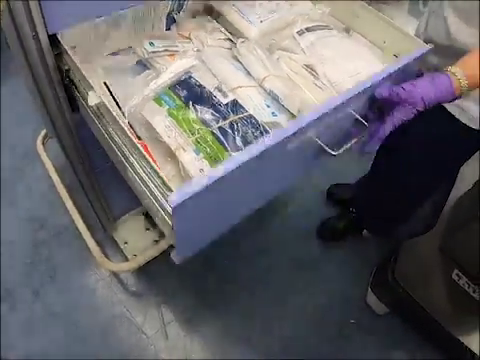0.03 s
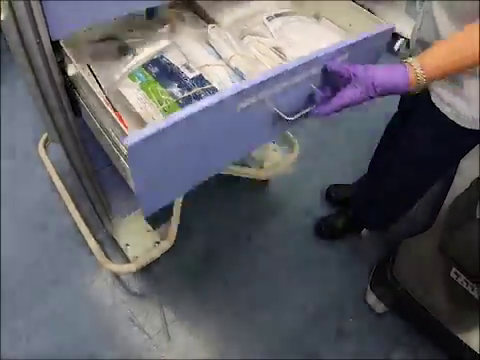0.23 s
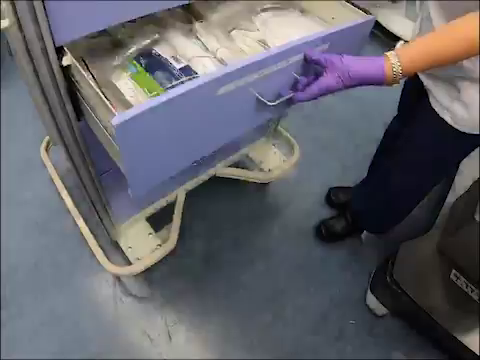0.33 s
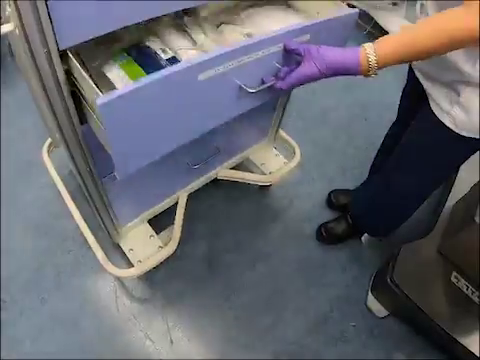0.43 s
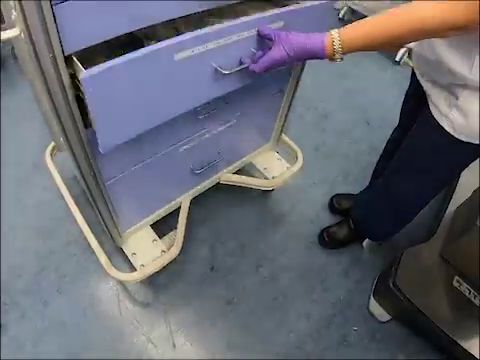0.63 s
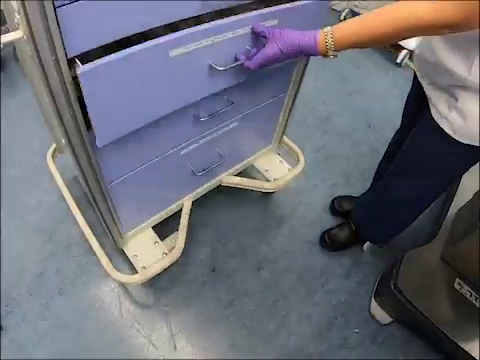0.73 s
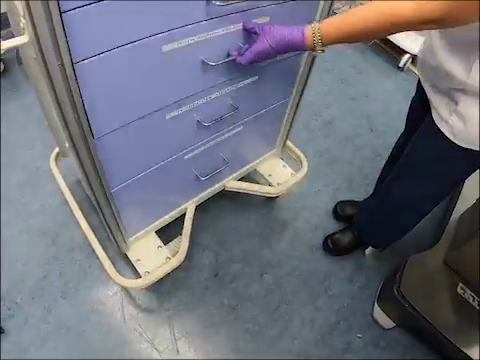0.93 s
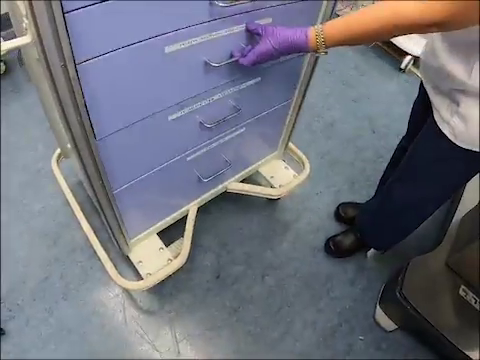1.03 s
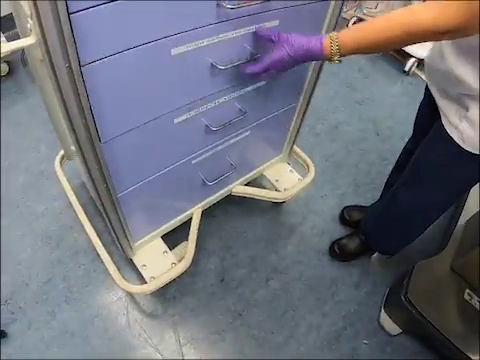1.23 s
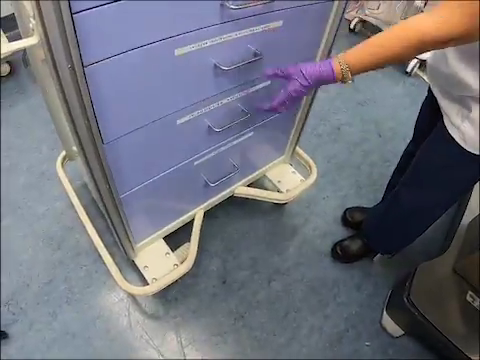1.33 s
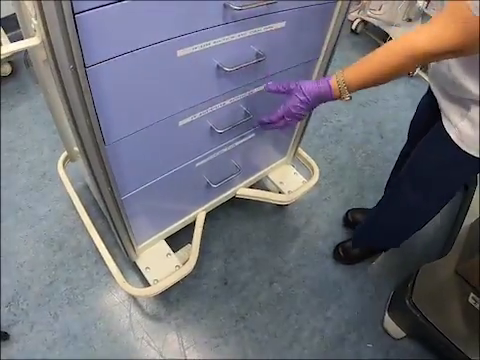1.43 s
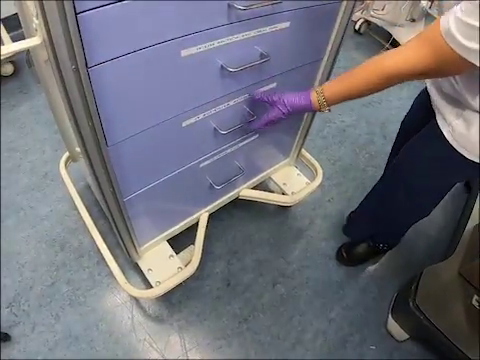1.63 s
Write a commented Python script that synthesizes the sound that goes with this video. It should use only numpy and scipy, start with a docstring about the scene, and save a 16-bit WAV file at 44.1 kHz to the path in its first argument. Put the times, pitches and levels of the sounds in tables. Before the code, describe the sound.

A metal cart drawer is pushed shut with a rattle, sharp clacks and a ringing bang.

```python
"""A loaded supply drawer jolts and rattles as it is pushed into a steel cart in a small, quiet room.
It clacks over its rail joint, squeaks faintly, then bangs into the cart and latches. Each blow is a
crack, chatter and ringing steel. The cart booms and rocks on its castors, the load shifts, and the
handle ticks as the hand lets go. Ventilation hums throughout."""
import sys
import numpy as np
from scipy import signal
from scipy.fft import rfft, irfft
from scipy.io import wavfile

SR = 44100
rng = np.random.default_rng(int(sys.argv[2]) if len(sys.argv) > 2 else 0)


def store_wav(level_fs):
    """Save 16-bit WAV to argv[1]."""
    pcm = np.round(np.clip(np.atleast_2d(level_fs), -1, 1) * 32767)
    wavfile.write(sys.argv[1], SR, pcm.T.astype(np.int16))


N = 74970
TIME_S = np.arange(N) / SR
FREQS_HZ = np.maximum(np.fft.rfftfreq(N, 1 / SR), 1)
BANDS_HZ = np.geomspace(60, 15000, num=20)

# Blows. Each row: start in seconds, part, ring level in dB, crack in dB re ring, treble shift in dB,
# chatter energy in dB re ring, chatter length in seconds.
BLOWS = [ (0.2357, "drawer", 2, 5, 1.5, -1.5, 0.082), (0.4448, "rail", -8.5, 13.5, 4, -20, .002),
         (0.4470, "rail", -9, 11.5, 9.5, -18, .002), (0.449, "rail", -12, -8, 12.5, -21, .002),
         (0.4554, "rail", -1, 12.5, -48, -16, 0.099), (0.7325, "cart", -12.5, 0.5, 6, 11.5, 0.024),
         (0.7432, "cart", 1, 9, -12.5, -22, 0.016), (0.7770, "latch", 2, 6, 0.5, -4.5, 0.073),
         (1.275, "handle", -3, 12, -0.5, -6, .004), ]
# Close-packed resonances, by part. Each row: frequency in Hz, level in dB per Hz.
PART_SPECTRA = { "drawer": [(70, -69), (160, -65.5), (280, -81), (430, -60.5), (700, -57), (1200, -62),
                (2200, -61.5), (3100, -68.5), (4000, -77.5), (9800, -87), (12000, -103)],
                "rail": [(70, -71.5), (220, -74), (390, -58.5), (560, -69.5), (830, -63.5), (1200, -78),
                (1800, -68.5), (3300, -76), (5500, -89.5), (9800, -95.5), (12000, -109)],
                "cart": [(70, -82), (150, -69), (260, -53.5), (400, -62), (550, -55.5), (700, -68),
                (850, -63), (1100, -66.5), (1900, -70.5), (2900, -67), (4000, -79.5), (9800, -93),
                (12000, -103)], "latch": [(150, -67), (450, -69.5), (1500, -70.5), (3000, -75.5),
                (4300, -79), (6700, -82), (10000, -87), (12000, -103)], "handle": [(2500, -130),
                (4500, -107), (7000, -110), (10000, -114), (13000, -132)], }
# Clear modes, by part. Each row: frequency in Hz, level in dB for a 0 dB blow, T60 in seconds.
PART_MODES = { "drawer": [(417, -44, .45), (565, -35, .58), (712, -33.5, .52), (755, -39, .42),
              (1023, -43, .42), (1085, -43, .42), (1227, -43, .22), (1672, -44, .4), (1803, -36.5, .45),
              (1992, -42.5, .45), (2262, -42.5, .45), (2482, -43.5, .45)], "rail": [(371, -42, .42),
              (818, -41.5, .38), (1610, -47, .3), (2250, -50, .4)], "cart": [(226, -36, .3),
              (316, -40, .38), (523, -34, .33), (615, -37.5, .28), (830, -39, .32), (1642, -43, .3),
              (2643, -44, .28), (2735, -47, .28)], "latch": [(2970, -55, 0.49), (6500, -56, 0.11)], }
# Base decay of parts and room together. Each row: frequency in Hz, T60 in seconds.
RING_T60_S = [(100, 0.47), (400, .43), (1000, 0.48), (2500, 0.44), (5000, 0.3), (11000, 0.21)]
# Factor on that decay, by part; the cart is damped, the drawer rings longest.
RING_T60_SCALE = {"drawer": 1.217, "rail": 1.134, "cart": 0.83, "latch": 0.88, "handle": 0.9}
# Crack decay. Each row: frequency in Hz, T60 in seconds.
CRACK_T60_S = [(400, 0.036), (2000, 0.081), (5000, 0.068), (10000, 0.016)]
# Crack low-end shelf. Each row: frequency in Hz, gain in dB.
CRACK_SHELF_DB = [(200, 0), (500, -2)]
# Base leftward bias of the crack in dB, by part.
CRACK_LEFT_DB = {"drawer": 6, "rail": 1, "cart": 9.5, "latch": 8, "handle": 0}
# Microphone directivity. Each row: frequency in Hz, factor on the leftward bias.
PAN_SCALE = [(250, .05), (1000, 0.71), (2200, 1.85), (4500, 0.14)]
# Panel and frame booms. Each row: start in seconds, frequency in Hz, peak in dB, length in seconds.
BOOMS = [(0.221, 81.9, -32.5, 0.17), (0.24, 141, -36, 0.049), (0.439, 86, -46, 0.146),
         (0.742, 121.6, -40.5, .06), (0.798, 62.6, -41, 0.14), (0.806, 90.5, -37, 0.067),
         (0.812, 30, -48, 0.067), (0.999, 84, -48.5, 0.26)]
# Load shifts. Each row: start in seconds, peak gain in dB, length in seconds.
LOAD_SHIFTS = [(0.094, 7, 0.37), (0.971, 1.5, 0.066), (1.008, 3, 0.084)]
# Shifting-load noise. Each row: frequency in Hz, level in dB per Hz.
LOAD_SPECTRUM = [(60, -86), (200, -78), (500, -83.5), (1200, -99), (4000, -109), (12000, -135)]
# Runner squeaks. Each row: start in seconds, peak in dB, length in seconds.
SQUEAKS = [(0.602, -54, 0.042), (0.61, -69, 0.082)]
# Runner whisper. Each row: frequency in Hz, level in dB per Hz.
GLIDE_SPECTRUM = [(200, -98), (420, -79), (900, -104.5), (2000, -104), (5000, -110), (9800, -118),
                  (11500, -134)]
# Ventilation air. Each row: frequency in Hz, level in dB per Hz.
AIR_SPECTRUM = [(35, -95), (65, -79.5), (100, -75.5), (200, -79), (400, -91), (850, -92.5), (1900, -102),
                (4000, -110), (9800, -119), (11500, -133), (15000, -142)]
# Fan tones. Each row: frequency in Hz, RMS level in dB.
FAN_TONES = [(159, -63), (215, -62.5), (302, -64), (684, -75.5)]
# Room sound field. Each row: frequency in Hz, left-right correlation.
STEREO_CORRELATION = [(60, 0.96), (200, 0.99), (380, .93), (700, 0.75), (1290, 0.17), (2380, 0.65),
                      (4400, 0.71), (8000, 0), (15000, 0)]
# Microphone response. Each row: frequency in Hz, gain in dB.
MIC_RESPONSE_DB = [(10500, -0.5), (13500, -4.5), (15000, 1)]

TREBLE_FROM_HZ, TREBLE_FULL_HZ = 1570, 5060
CRACK_TREBLE_DB, RING_LEFT_DB = 2.5, -0.5
CRACK_RISE_CYCLES, ROOM_RISE_S, MODE_RISE_S = 1, 0.006, 0.004
CHATTER_SPREAD_DB, CHATTER_CRACK_DB = 4, -8
GLIDE_HOLD_S, GLIDE_FADE_S = 0.14, 0.16
SQUEAK_HZ, SQUEAK_WOBBLE_RAD = 2197, 2.2
FAN_WAVER, STOPBAND_HZ = 0.25, 15700


def struck_part(part):
    """Struck steel: a short crack, dense ringing that fills the room, any clear modes on top."""
    at, energy, crack_ratio, treble_db = contacts(part)
    low_cut = np.minimum(FREQS_HZ / BANDS_HZ[0], 1) ** 2
    dense = stereo_noise() * from_db(at_hz(PART_SPECTRA[part], FREQS_HZ)) * low_cut
    band_index = np.interp(np.log(FREQS_HZ), np.log(BANDS_HZ), np.arange(len(BANDS_HZ)))
    out = np.zeros((2, N))
    for k, hz in enumerate(BANDS_HZ):
        band = irfft(dense * np.maximum(1 - np.abs(band_index - k), 0), N)
        treble = at_hz([(TREBLE_FROM_HZ, 0), (TREBLE_FULL_HZ, 1)], hz)
        fed = energy * from_db(treble_db * treble) ** 2
        width = at_hz(PAN_SCALE, hz)
        crack = envelope(at, fed * crack_ratio, at_hz(CRACK_T60_S, hz), CRACK_RISE_CYCLES / hz)
        crack *= from_db(CRACK_TREBLE_DB * treble + at_hz(CRACK_SHELF_DB, hz))
        ring = envelope(at, fed, RING_T60_SCALE[part] * at_hz(RING_T60_S, hz), ROOM_RISE_S)
        out += band * np.hypot(pan(CRACK_LEFT_DB[part] * width) * crack, pan(RING_LEFT_DB * width) * ring)
    for hz, db, t60_s in PART_MODES.get(part, []):
        spread_rad = np.arccos(at_hz(STEREO_CORRELATION, hz)) * rng.choice([-1, 1])
        phase = 2 * np.pi * (hz * TIME_S + rng.random()) + spread_rad * np.array([[.5], [-.5]])
        out += from_db(db) * envelope(at, energy, t60_s, MODE_RISE_S) * np.sin(phase)
    return out


def contacts(part, count=16):
    """Blows on a part and their chatter: sample, ring energy, crack energy ratio, treble dB."""
    rows = []
    for start_s, struck, ring_db, crack_db, treble_db, chatter_db, chatter_s in BLOWS:
        if struck == part:
            rows.append((start_s, from_db(ring_db) ** 2, from_db(crack_db) ** 2, treble_db))
            delays_s = chatter_s * (np.arange(count) + rng.random(count)) / count
            shares = from_db(CHATTER_SPREAD_DB * rng.standard_normal(count)) ** 2
            chatter_energy = from_db(ring_db + chatter_db) ** 2
            chatter_crack = from_db(crack_db + CHATTER_CRACK_DB) ** 2
            for delay_s, share in zip(delays_s, shares / shares.sum()):
                rows.append((start_s + delay_s, share * chatter_energy, chatter_crack, treble_db))
    times_s, energy, crack_ratio, treble_db = np.transpose(rows)
    return (times_s * SR).astype(int), energy, crack_ratio, treble_db


def envelope(at, energy, t60_s, rise_s):
    """Amplitude of a resonance fed by contacts: builds up, then dies away."""
    fed = np.bincount(at, energy, N)[:N] + 1e-18
    fall = from_db(-60 / (t60_s * SR)) ** 2
    rise = np.exp(-1 / (rise_s * SR))
    return np.sqrt(signal.lfilter([1 - rise], [1, -rise - fall, rise * fall], fed))


def cart_body():
    """Panels and frame boom; the load shifts softly as the drawer runs and the cart rocks."""
    booms = sum(from_db(db) * swell(start_s, length_s) * np.sin(2 * np.pi * hz * (TIME_S - start_s))
                for start_s, hz, db, length_s in BOOMS)
    return booms + coloured_noise(LOAD_SPECTRUM) * swells(LOAD_SHIFTS)


def runners():
    """The runners whisper at speed, then give a short, rough squeak."""
    fade = np.clip(1 - (TIME_S - GLIDE_HOLD_S) / GLIDE_FADE_S, 0, 1)
    whisper = coloured_noise(GLIDE_SPECTRUM) * fade
    squeak = np.sin(2 * np.pi * SQUEAK_HZ * TIME_S + SQUEAK_WOBBLE_RAD * drift(rate_hz=280))
    return whisper + swells(SQUEAKS) * squeak


def ventilation():
    """Dull steady air with wavering fan tones."""
    tones = np.zeros(N)
    for hz, db in FAN_TONES:
        level = np.sqrt(2) * from_db(db) * (1 + FAN_WAVER * drift(rate_hz=9.4))
        tones += level * np.sin(2 * np.pi * hz * TIME_S + drift(rate_hz=6))
    return coloured_noise(AIR_SPECTRUM) + tones


def stereo_noise():
    """Stereo noise spectrum at 0 dB per Hz, alike in the bass, unrelated in the top treble."""
    mid, side = rfft(rng.standard_normal((2, N))) * np.sqrt(SR / 2)
    alike = at_hz(STEREO_CORRELATION, FREQS_HZ)
    return mid + side * np.sqrt((1 - alike) / (1 + alike)) * [[1], [-1]]


def coloured_noise(spectrum):
    """Stereo noise with the given spectrum."""
    return irfft(stereo_noise() * from_db(at_hz(spectrum, FREQS_HZ)), N)


def drift(rate_hz):
    """Random wander, spread near 1."""
    return np.interp(TIME_S * rate_hz, np.arange(2000), rng.standard_normal(2000))


def swell(start_s, length_s):
    """Smooth rise and fall."""
    return np.sin(np.pi * np.clip((TIME_S - start_s) / length_s, 0, 1)) ** 2


def swells(rows):
    """Summed gain of several swells."""
    return sum(from_db(db) * swell(start_s, length_s) for start_s, db, length_s in rows)


def pan(left_db):
    """Left and right gains."""
    return from_db(np.array([[.5], [-.5]]) * left_db)


def at_hz(table, hz):
    """Table lookup on a log-frequency axis."""
    knots_hz, values = np.transpose(table)
    return np.interp(np.log(hz), np.log(knots_hz), values)


def from_db(db):
    """Decibels to gain."""
    return 10 ** (np.asarray(db) / 20)


def scene():
    """Drawer, cart and room together."""
    return sum(struck_part(part) for part in PART_SPECTRA) + runners() + cart_body() + ventilation()


def record(dry):
    """Microphone: a dip in the top octave, then a steep low-pass."""
    dulled = irfft(rfft(dry) * from_db(at_hz(MIC_RESPONSE_DB, FREQS_HZ)), N)
    return signal.sosfilt(signal.cheby2(14, 70, STOPBAND_HZ, fs=SR, output="sos"), dulled)


dry = scene()
out = record(dry)
store_wav(out)
```